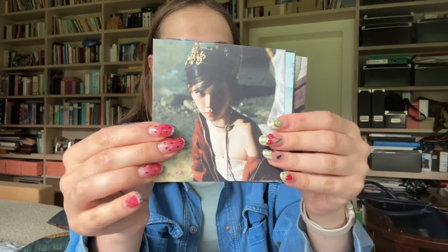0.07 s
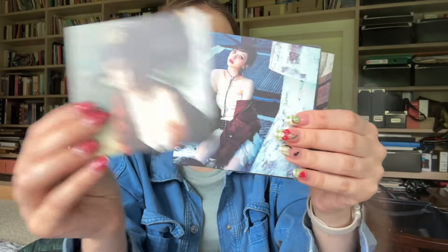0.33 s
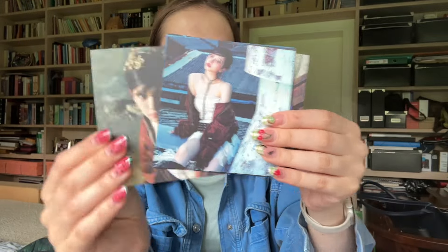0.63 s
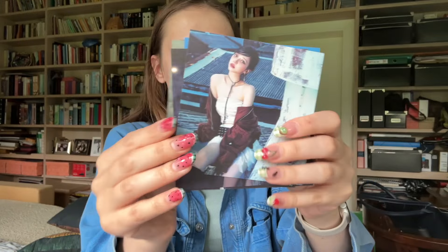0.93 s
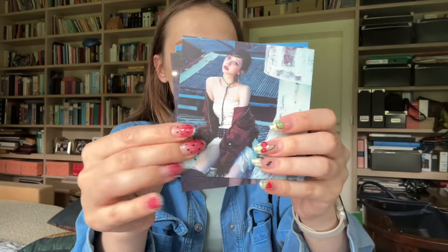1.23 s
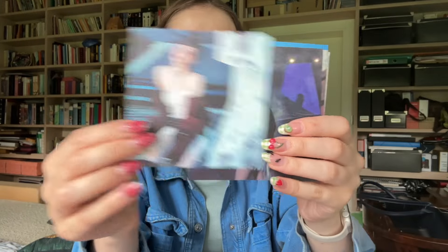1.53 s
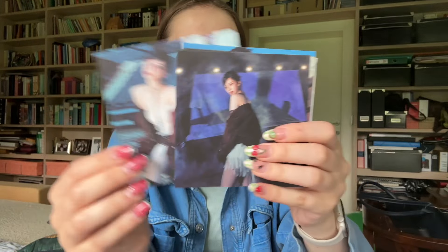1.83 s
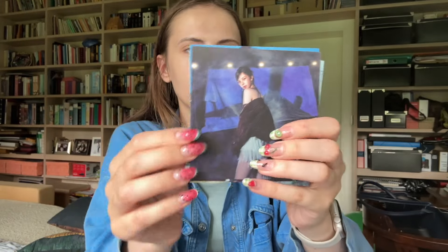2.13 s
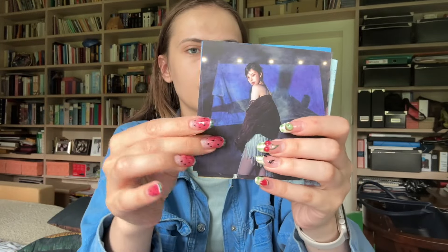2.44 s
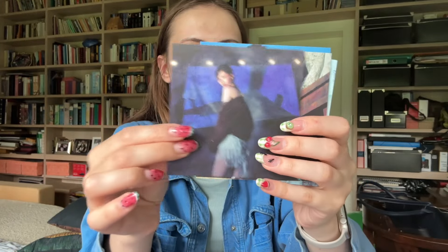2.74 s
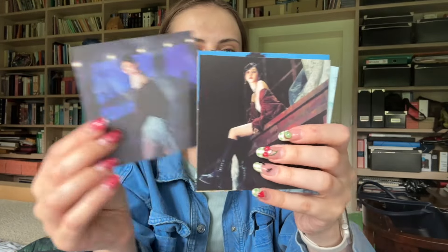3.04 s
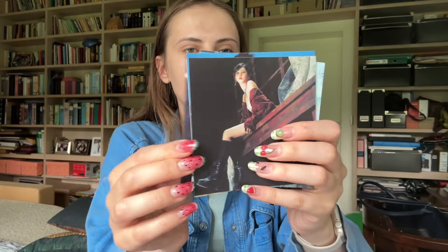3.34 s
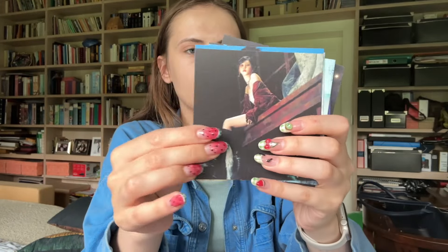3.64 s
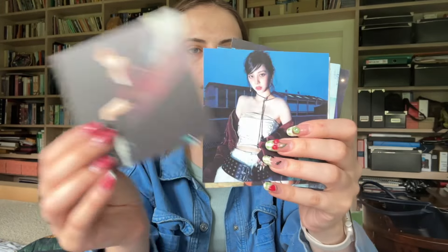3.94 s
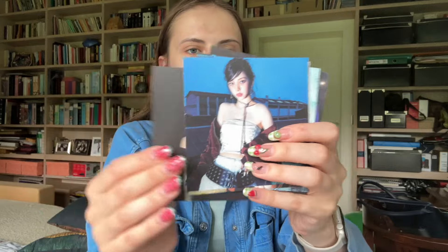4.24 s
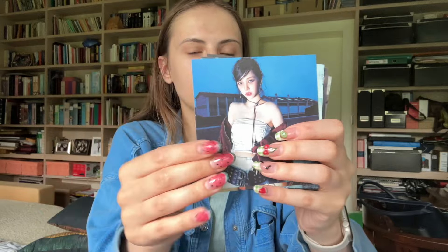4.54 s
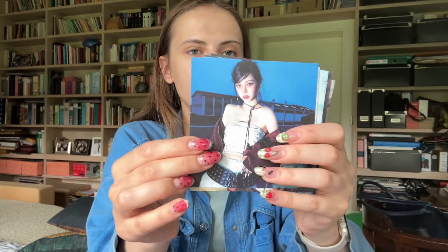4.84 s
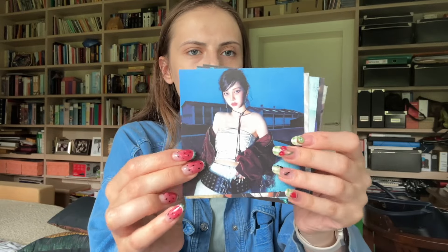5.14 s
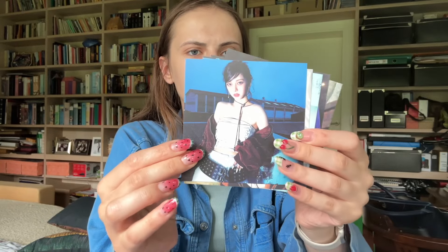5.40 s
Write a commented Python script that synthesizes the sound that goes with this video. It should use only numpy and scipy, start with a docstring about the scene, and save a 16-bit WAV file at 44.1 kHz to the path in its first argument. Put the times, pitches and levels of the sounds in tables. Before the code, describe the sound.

Hands slide stiff paper cards off a stack one by one and tuck them behind, rustling and ticking in a quiet room.

```python
"""Glossy paper cards, leafed through by hand, close up in a small furnished room.
Four times the top card slides off the stack, scrapes over its edge, flicks free and is tucked in
behind; a fifth pull starts at the end. Sliding is countless tiny slips: faces hiss, fingers rub.
The cards tick as they stick and slip, crack as an edge springs free, and flap softly as they bend.
Underneath: hand rumble, a steady noise floor and one faint far tone."""
import sys
import numpy as np
from scipy import signal
from scipy.fft import rfft, irfft, next_fast_len
from scipy.io import wavfile
from scipy.ndimage import uniform_filter1d, map_coordinates

SR = 44100
rng = np.random.default_rng(int(sys.argv[2]) if len(sys.argv) > 2 else 0)


def store_wav(level_fs):
    """Save 16-bit WAV to argv[1]."""
    pcm = np.round(np.clip(np.atleast_2d(level_fs), -1, 1) * 32767)
    wavfile.write(sys.argv[1], SR, pcm.T.astype(np.int16))


N = 245637

# Top card drawn off. Each row: release in seconds, length in seconds, hiss and rub in dB before the tug.
PULLS = [(0.262, 0.156, -41, -50), (1.492, 0.16, -41.5, -51.5), (2.761, 0.13, -41.5, -48.5),
         (3.816, 0.15, -46, -50.5), (5.6, 0.21, -50.5, -57)]
# Card tucked in behind. Each row: start in seconds, hiss in dB, rub in dB, fade in dB per second.
TUCKS = [(0.505, -48, -55, 34), (1.732, -41.5, -47, 123), (3.02, -44, -48.5, 90), (4.047, -43, -45.5, 87)]
# Fingers align the cards. Each row: start in seconds, length in seconds, hiss in dB, rub in dB.
NUDGES = [(0.002, 0.08, -49, -53), (0.442, 0.079, -55, -62), (0.643, 0.061, -50, -54.5),
          (0.716, 0.078, -51.5, -58), (0.774, 0.1, -46, -52.5), (0.848, 0.21, -54, -50.5),
          (1.105, 0.079, -49.5, -53), (1.211, 0.083, -52.5, -59), (1.858, 0.055, -51, -54),
          (1.918, 0.12, -60.5, -60.5), (2.073, 0.046, -70, -60), (2.176, 0.14, -62, -58),
          (2.467, 0.046, -54, -54), (2.569, 0.083, -46.5, -47), (2.938, 0.06, -55.5, -61),
          (3.231, 0.094, -53, -52), (3.344, 0.073, -54, -63), (3.464, 0.13, -51.5, -54.5),
          (3.568, 0.12, -46.5, -51), (3.99, 0.062, -54.5, -57.5), (4.133, 0.14, -47.5, -51),
          (4.3, 0.081, -52, -54), (4.37, 0.095, -50, -60.5), (4.479, 0.07, -53, -58.5),
          (4.614, 0.1, -58, -67), (4.752, 0.18, -61.5, -63), (4.925, 0.073, -55, -63.5),
          (5.014, 0.029, -58, -74), (5.064, 0.035, -62, -66.5), (5.194, 0.05, -59, -67)]
# Edge drags over edge. Each row: start in seconds, length in seconds, hiss in dB, rasp in dB.
SCRAPES = [(0.24, 0.018, -27, -45), (0.256, 0.02, -26.5, -39), (0.28, 0.028, -46, -44),
           (0.5086, 0.011, -37, -40), (0.908, 0.032, -70, -46.5), (1.02, 0.0052, -53, -42.5),
           (1.489, 0.009, -22, -40.5), (1.728, 0.0043, -29, -34), (1.819, 0.017, -68, -48),
           (2.26, 0.01, -51.5, -59), (2.35, 0.0049, -56, -56), (2.373, 0.006, -56, -57),
           (2.745, 0.01, -25, -41), (3.026, 0.028, -35, -42.5), (3.266, 0.012, -45, -44.5),
           (3.413, 0.0034, -50, -46), (3.819, 0.0054, -32.5, -46), (4.059, 0.024, -33, -45),
           (4.097, 0.022, -44.5, -51), (4.33, 0.0043, -45, -48.5), (5.118, 0.011, -55, -67),
           (5.151, 0.034, -48.5, -63.5)]
# Trailing edge flicks off the stack. Each row: start in seconds, hiss in dB, rasp in dB.
FLICKS = [(1.526, -24, -29.5), (2.7926, -28.5, -32.5), (3.8598, -35.5, -38)]
# Sliding edge chatters. Each row: start in seconds, length in seconds, band centre in Hz, level in dB.
SQUEAKS = [(0.509, 0.01, 8400, -36), (2.755, 0.0034, 4630, -38), (3.031, 0.0036, 4130, -33.5),
           (4.056, 0.0083, 4200, -32.5), (4.066, 0.0091, 4120, -36)]
# Single slips of the gripped stack. Each row: start in seconds, peak in dB, low-pass cutoff in Hz.
TICKS = [(0.041, -24, 3620), (0.2022, -36, 3650), (0.604, -43, 1310), (0.676, -45, 1200),
         (0.9541, -28.5, 4500), (1.074, -42, 2280), (1.1046, -31.5, 3300), (1.1164, -26.5, 3700),
         (1.1356, -28.5, 3700), (1.1498, -24, 3660), (1.178, -25.5, 3600), (1.2811, -30.5, 3700),
         (1.545, -36, 3300), (1.7835, -27.5, 3500), (1.961, -28, 3630), (1.979, -32, 3480),
         (2.01, -39, 3470), (2.0338, -43, 2800), (2.285, -42, 2600), (2.3055, -39, 2970),
         (2.3261, -35.5, 2930), (2.611, -25.5, 3500), (2.811, -33, 3700), (3.079, -33, 2400),
         (3.104, -30.5, 2600), (3.1271, -34, 1570), (3.214, -43.5, 1300), (3.2963, -42, 2500),
         (3.4436, -38, 7000), (3.559, -27.5, 3700), (3.5843, -32, 3000), (3.5944, -30, 3000),
         (4.1055, -33, 3500), (4.1125, -26.5, 3560), (4.4699, -38.5, 5970), (4.8578, -18.4, 3360),
         (4.9351, -43, 1600), (5.0734, -28.5, 3700)]
# Edge springs free or hits the stack. Each row: start in seconds, crack peak in dB,
# bending-wave travel time at 1 kHz in seconds, shudder in dB.
SNAPS = [(0.5033, -30, 0.0012, -34), (1.7295, -9, 0.00045, -32), (2.7933, -30, 0.0012, -36.5),
         (3.0176, -26, 0.0015, -33.5), (3.273, -44, 0.0014, -37.5), (3.4108, -59, 0.0011, -43),
         (3.8607, -23, 0.00053, -34), (4.0454, -33, 0.00157, -30.5), (4.113, -40, 0.00055, -32),
         (4.327, -33, .001, -40), (4.8572, -36, 0.00012, -34.5)]
# Bending card pushes air. Each row: start in seconds, peak in dB, frequency in Hz.
FLAPS = [(0.246, -33.5, 70), (0.312, -49, 373), (0.355, -41.5, 144), (0.506, -34.5, 168), (1.131, -41, 105),
         (1.529, -41, 109), (1.733, -31.5, 97), (2.008, -44, 96), (2.208, -39, 99), (2.795, -38.5, 114),
         (3.019, -31, 157), (3.03, -37.5, 218), (3.269, -33, 78.6), (3.271, -42, 308), (3.413, -32, 76),
         (3.56, -39, 106), (3.824, -32, 90), (3.918, -40.5, 112), (4.049, -30, 134), (4.11, -34.5, 143),
         (4.115, -40, 294), (4.324, -38.5, 104), (4.856, -38.5, 103)]
# Modes of the held stack. Each row: frequency in Hz, relative level in dB, T60 in seconds.
STACK_MODES = [(742, -18.5, 0.019), (1113, -12, 0.0099), (1600, -8, 0.0088), (2100, -0.5, 0.0016),
               (2520, -35, 0.0032)]

# Spectra. Each row: frequency in Hz, relative spectral density in dB.
FACE_HISS_DB = [(1500, -21), (3500, -5), (5200, -2.5), (6600, -3.5), (8500, 1.5), (10500, -3.5),
                (13000, -11.5), (15500, -12.5)]  # face gliding on face
FACE_FIZZ_DB = [(7000, -15), (10000, -0.5), (13500, 6), (15500, -5)]  # fast glide
FINGER_RUB_DB = [(100, 5), (300, -5), (560, -14.5), (800, -3), (1600, 0), (2500, 0), (4000, -6),
                 (6500, -39)]  # sliding under finger pressure
EDGE_HISS_DB = [(1500, -38), (3500, -11), (5200, -2.5), (6600, -2.5), (8300, 4), (10500, -2), (13000, -3),
                (15500, -4.5)]  # edge crossing, treble
EDGE_FIZZ_DB = [(7000, -27), (11000, -1), (14000, 4), (15800, -4)]  # quick edge crossing
EDGE_RASP_DB = [(200, -1), (500, -15.5), (850, -7), (1300, -2), (2500, -0.5), (4000, -4), (6500, -19.5)]  # edge crossing, coarse part
CRACK_DB = [(100, -1), (550, -8.5), (780, 9.5), (1000, -8.5), (2000, 6.5), (3000, 3), (4100, 11.5),
            (5000, 2.5), (9500, -12.5), (15500, -14)]  # direct bending wave
SHUDDER_DB = [(90, -27), (200, 3), (300, -0.5), (550, -4.5), (780, -1), (1150, 1.5), (1900, -8.5),
              (2800, -3), (4000, -13), (9000, -6.5), (15000, -12.5)]  # its reflections
HAND_RUMBLE_DB = [(20, 3.5), (60, 1.5), (110, -7.5), (200, -17.5), (350, -18.5), (700, -35), (2000, -75)]  # hands holding the stack
NOISE_FLOOR_DB = [(15, -25), (25, -5), (113, 0), (188, -13), (240, -8), (340, -30), (433, -16), (567, -23),
                  (1570, -24.5), (3630, -29), (6380, -33), (8810, -35), (15500, -33)]  # steady background

# Decay of a free card and of the room. Each row: frequency in Hz, T60 in seconds.
CARD_T60_S = [(150, 0.1), (400, 0.071), (1200, 0.039), (4000, 0.017), (14000, 0.017)]
ROOM_T60_S = [(150, 0.27), (2000, 0.89), (14000, 0.17)]


def sliding_cards(hiss_db, rub_db, fast_db=-38, brightening=0.71, catches_per_s=45, catch_db=7):
    """Faces glide with a hiss that brightens with speed; finger pressure adds a rub with small catches."""
    pressure_db = 1.2 * wobble(60)
    speed_db = hiss_db + pressure_db + 0.51 * wobble(180)
    fizz_db = speed_db + brightening * (speed_db - fast_db)
    hiss = amp(speed_db) * friction(FACE_HISS_DB, grain_db=2, patchy_db=2)
    fizz = amp(fizz_db) * friction(FACE_FIZZ_DB, grain_db=2, patchy_db=2)
    catches = (rng.random(N) < catches_per_s / SR) * rng.standard_normal(N)
    rub = friction(FINGER_RUB_DB, grain_db=4, patchy_db=3)
    rub += amp(catch_db) * signal.fftconvolve(catches, stack_jolt(cutoff_hz=3200))[:N]
    return hiss + fizz + amp(rub_db + pressure_db) * rub


def friction(spectrum, grain_db, patchy_db):
    """Countless tiny slips of uneven size; their colour drifts as the contact moves. RMS 1."""
    slips = rng.standard_normal(N) * amp(grain_db * wobble(1800))
    bins = signal.stft(slips, nperseg=256)[2]
    drift = uniform_filter1d(rng.standard_normal(bins.shape), size=5, axis=0)
    drift = unit(uniform_filter1d(drift, size=12, axis=1))
    patchy = signal.istft(bins * amp(patchy_db * drift), nperseg=256)[1][:N]
    return coloured(patchy, spectrum)


def hand_strokes(grip_hiss_db=-78, grip_rub_db=-74):
    """Hiss and rub levels in dB from pulls, tucks and nudges; held cards never lie quite still."""
    t = np.arange(SR) / SR
    moves = []
    for release_s, length_s, hiss_db, rub_db in PULLS:
        moves.append((release_s - length_s, pull(t, length_s), hiss_db, rub_db))
    for start_s, hiss_db, rub_db, fade_db_per_s in TUCKS:
        moves.append((start_s, tuck(t, fade_db_per_s), hiss_db, rub_db))
    for start_s, length_s, hiss_db, rub_db in NUDGES:
        moves.append((start_s, hump(length_s, skew=0.76, sharpness=0.96), hiss_db, rub_db))
    wander_db = 2 * wobble(22)
    hiss_power = amp(grip_hiss_db + wander_db) ** 2
    rub_power = amp(grip_rub_db + wander_db) ** 2
    for start_s, envelope, hiss_db, rub_db in moves:
        add(hiss_power, start_s, (amp(hiss_db) * envelope) ** 2)
        add(rub_power, start_s, (amp(rub_db) * envelope) ** 2)
    return settling(hiss_power), settling(rub_power)


def pull(t, length_s, rise_s=0.033, gain_db_per_s=36.5, tug_db=6, tug_s=0.0034, stop_s=0.0014,
         coast_db=-10, coast_fade_db_per_s=130.5):
    """Envelope: the card gathers speed, a last tug frees it, its corner trails on."""
    before_s, after_s = np.maximum(length_s - t, 0), np.maximum(t - length_s, 0)
    draw = (1 - np.exp(-(t / rise_s) ** 2)) * amp(-gain_db_per_s * before_s)
    tug = amp(tug_db * np.exp(-before_s / tug_s)) * np.exp(-after_s / stop_s)
    coast = amp(coast_db - coast_fade_db_per_s * after_s)
    return draw * np.maximum(tug, coast)


def tuck(t, fade_db_per_s, rise_s=0.0054, stop_s=0.22):
    """Envelope: the card glides in behind the stack, slows and stops."""
    return (1 - np.exp(-t / rise_s)) * amp(-fade_db_per_s * t) * np.exp(-(t / stop_s) ** 6)


def settling(power, rustle_db=-9.5, decay_s=0.034):
    """The cards rustle on briefly after each move. Power in, dB out."""
    pole = np.exp(-1 / (decay_s * SR))
    rustle = signal.lfilter([1 - pole], [1, -pole], power)
    return 10 * np.log10(power + amp(rustle_db) ** 2 * rustle)


def scraping_edges(lead_s=0.00049, flick_s=0.0025, quick_s=0.0089, fizz_db=-3):
    """An edge rasps across the next or flicks off and buzzes out; quicker is brighter. Some squeak."""
    touches = [(start_s, length_s, edge_contact(length_s + lead_s), hiss_db, rasp_db)
               for start_s, length_s, hiss_db, rasp_db in SCRAPES]
    flick = edge_contact(flick_s + lead_s, trail_db=-4.5, trail_s=0.0094)
    touches += [(start_s, flick_s, flick, hiss_db, rasp_db) for start_s, hiss_db, rasp_db in FLICKS]
    hiss, fizz, rasp = np.zeros((3, N))
    for start_s, length_s, envelope, hiss_db, rasp_db in touches:
        quickness = 1 / (1 + (length_s / quick_s) ** 2)
        add(hiss, start_s - lead_s, amp(hiss_db) * envelope)
        add(fizz, start_s - lead_s, amp(hiss_db + fizz_db) * quickness * envelope)
        add(rasp, start_s - lead_s, amp(rasp_db) * envelope)
    squeaks = squeaking_edges()
    hiss *= friction(EDGE_HISS_DB, grain_db=2.5, patchy_db=1.5)
    fizz *= friction(EDGE_FIZZ_DB, grain_db=0, patchy_db=4)
    rasp *= friction(EDGE_RASP_DB, grain_db=0.5, patchy_db=3)
    return hiss + fizz + rasp + squeaks


def squeaking_edges(half_width=0.097):
    """A sliding edge chatters in a narrow band."""
    out = np.zeros(N)
    for start_s, length_s, hz, level_db in SQUEAKS:
        band = signal.butter(2, [hz * (1 - half_width), hz * (1 + half_width)], "bandpass", fs=SR)
        chatter = unit(signal.lfilter(*band, rng.standard_normal(SR // 10)))
        add(out, start_s, amp(level_db) * edge_contact(length_s) * chatter)
    return out


def edge_contact(length_s, rise_s=0.001, fall_s=0.0024, trail_db=-20, trail_s=0.0086):
    """Envelope: an edge bites, drags, lets go and brushes on for a moment."""
    t = np.arange(SR // 10) / SR
    after_s = np.maximum(t - length_s, 0)
    release = np.maximum(np.exp(-after_s / fall_s), amp(trail_db) * np.exp(-after_s / trail_s))
    return (1 - np.exp(-t / rise_s)) * release


def ticking_stack():
    """The gripped cards stick and let go; soft finger pads dull the tick."""
    out = np.zeros(N)
    for start_s, peak_db, cutoff_hz in TICKS:
        add(out, start_s, amp(peak_db) * stack_jolt(cutoff_hz))
    return out


def stack_jolt(cutoff_hz, scatter_db=1.5, leak=0.07):
    """One slip rings the stack; the fingers damp it at once. Peak 1."""
    t = np.arange(SR // 30) / SR
    tuning = np.exp(rng.normal(0, 0.077))
    ring = np.zeros(len(t))
    for hz, level_db, t60_s in STACK_MODES:
        envelope = amp(level_db + rng.normal(0, scatter_db) - 60 * t / t60_s)
        ring += envelope * np.cos(2 * np.pi * hz * tuning * t)
    dulled = signal.lfilter(*signal.butter(4, cutoff_hz * tuning, fs=SR), ring) + leak * ring
    return dulled / np.abs(dulled).max()


def snapping_cards(size=2048):
    """A crack crosses the card as a bending wave, treble first; reflections leave it shuddering."""
    hz, out = np.fft.rfftfreq(size, 1 / SR), np.zeros(N)
    lead_samples = size // 8
    body = np.roll(irfft(amp(along(SHUDDER_DB, hz))), size // 2)
    body /= np.linalg.norm(body)
    for start_s, peak_db, travel_s, shudder_db in SNAPS:
        phase = 4 * np.pi * travel_s * np.sqrt(1000 * hz)  # group delay goes as 1 / sqrt(hz)
        crack = np.roll(irfft(amp(along(CRACK_DB, hz)) * np.exp(-1j * phase)), lead_samples)
        add(out, start_s - lead_samples / SR, amp(peak_db) * crack / np.abs(crack).max())
        shudder = signal.fftconvolve(dying_noise(CARD_T60_S, size=128), body, "same")
        add(out, start_s, amp(shudder_db) * shudder)
    return out


def flapping_cards(t60_s=0.046, attack_s=0.00076):
    """Bent cards swing back and push air: a quickly damped sine."""
    t, out = np.arange(SR // 5) / SR, np.zeros(N)
    envelope = amp(-60 * t / t60_s) * (1 - np.exp(-t / attack_s))
    for start_s, peak_db, hz in FLAPS:
        swing = np.sin(2 * np.pi * hz * t) * envelope
        add(out, start_s, amp(peak_db) * swing / np.abs(swing).max())
    return out


def hand_rumble(rub_db, level_db=-54.5, follow_db_per_db=0.11, inertia_s=0.033, lumpy_db=3):
    """The hands rumble unevenly, more when they press and move."""
    effort_db = uniform_filter1d(rub_db - rub_db.mean(), int(inertia_s * SR))
    rumble = coloured(rng.standard_normal(N), HAND_RUMBLE_DB) * amp(lumpy_db * wobble(28))
    return amp(level_db + follow_db_per_db * effort_db) * unit(rumble)


def room_tail(x):
    """The shelves return a short tail, 5 ms late."""
    tail = dying_noise(ROOM_T60_S, size=256)
    return signal.fftconvolve(np.pad(x, (SR // 200, 0)), tail / np.linalg.norm(tail))[:N]


def far_tone(start_s=4.41, length_s=0.37, pitch_hz=471, level_db=-71, waver_hz=5, waver_db=4):
    """A soft, slightly wavering tone from far off."""
    swell = np.zeros(N)
    add(swell, start_s, hump(length_s, skew=0.57, sharpness=0.38))
    hz = pitch_hz + waver_hz * wobble(16)
    return swell * amp(level_db + waver_db * wobble(12)) * np.sin(2 * np.pi * np.cumsum(hz) / SR)


def hump(length_s, skew, sharpness):
    """Envelope from rest to rest, peak 1; skew below 1 peaks early."""
    progress = np.linspace(0, 1, int(length_s * SR))
    return np.abs(np.sin(np.pi * progress ** skew)) ** sharpness


def dying_noise(t60_table, size):
    """Noise with its own decay time at each frequency."""
    hz, t, bins = signal.stft(rng.standard_normal(SR // 2), SR, nperseg=size)
    decay = amp(-60 * t / along(t60_table, hz)[:, None])
    return signal.istft(bins * decay, SR, nperseg=size)[1]


def wobble(knots_per_s):
    """Smooth random curve."""
    knots = rng.standard_normal(int(N * knots_per_s / SR) + 4)
    return map_coordinates(knots, [np.arange(N) * knots_per_s / SR])


def coloured(x, spectrum):
    """x shaped by a spectrum, at RMS 1."""
    return unit(filtered(x, lambda hz: amp(along(spectrum, hz))))


def filtered(x, response):
    """x through a gain given as a function of Hz."""
    size = next_fast_len(N + SR // 2)
    return irfft(rfft(x, size) * response(np.fft.rfftfreq(size, 1 / SR)), size)[:N]


def along(points, hz):
    """Interpolate (Hz, value) points on a log frequency axis."""
    knots_hz, values = np.transpose(points)
    return np.interp(np.log(hz + 1), np.log(knots_hz + 1), values)


def add(track, start_s, sound):
    """Mix a sound into the track in place."""
    part = track[max(round(start_s * SR), 0):][:len(sound)]
    part += sound[:len(part)]


def amp(db):
    return 10 ** (np.asarray(db) / 20)


def unit(x):
    return x / np.sqrt(np.mean(x ** 2) + 1e-20)


def scene(wet_db=-22, floor_db=-60):
    """Cards, room and background, mono."""
    hiss_db, rub_db = hand_strokes()
    cards = sliding_cards(hiss_db, rub_db) + scraping_edges() + ticking_stack()
    cards += snapping_cards() + flapping_cards() + hand_rumble(rub_db)
    background = amp(floor_db) * coloured(rng.standard_normal(N), NOISE_FLOOR_DB) + far_tone()
    return (cards + amp(wet_db) * room_tail(cards) + background)[None]


def record(dry, top_hz=16050):
    """Brick-wall low-pass."""
    return filtered(dry[0], lambda hz: hz < top_hz)[None]


dry = scene()
out = record(dry)
store_wav(out)
```